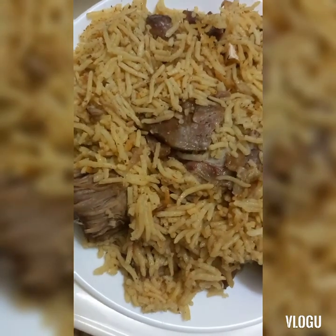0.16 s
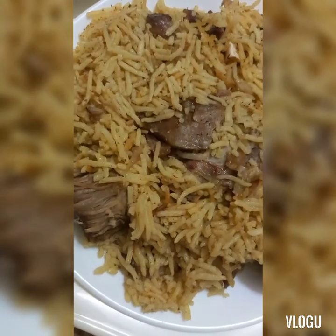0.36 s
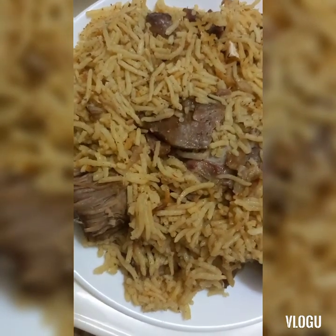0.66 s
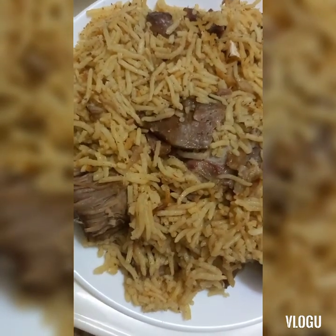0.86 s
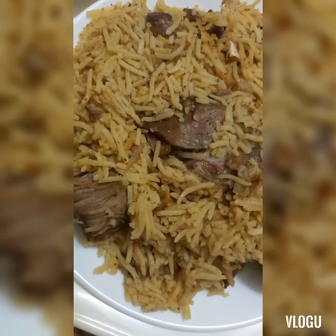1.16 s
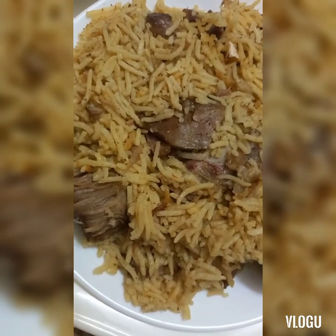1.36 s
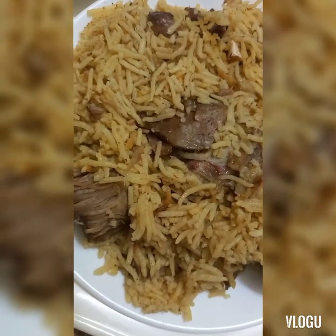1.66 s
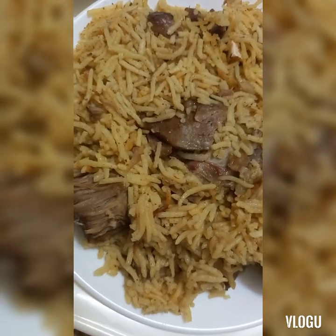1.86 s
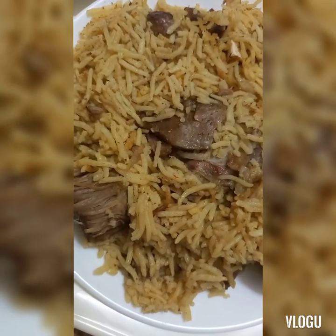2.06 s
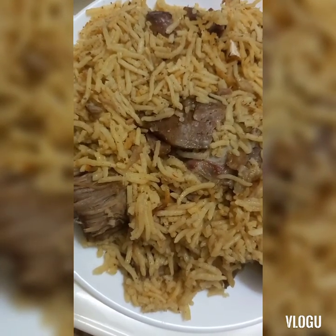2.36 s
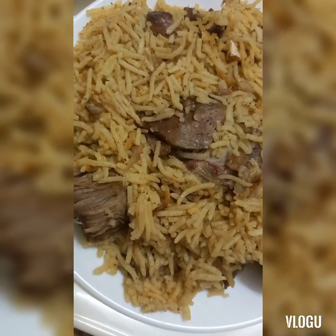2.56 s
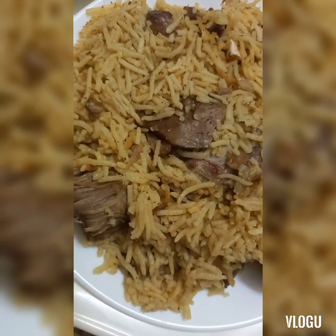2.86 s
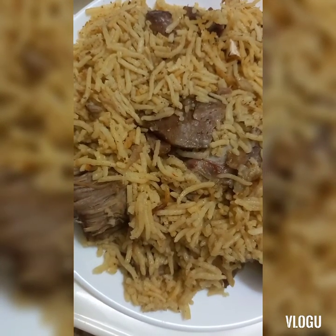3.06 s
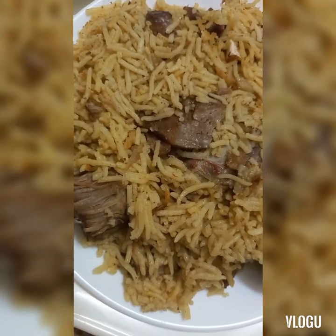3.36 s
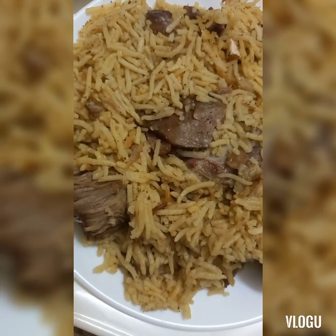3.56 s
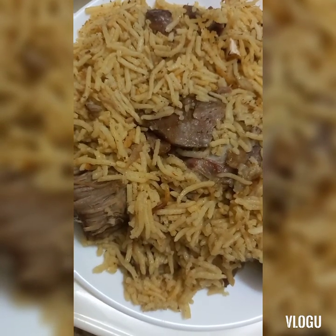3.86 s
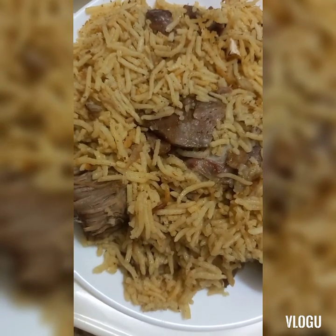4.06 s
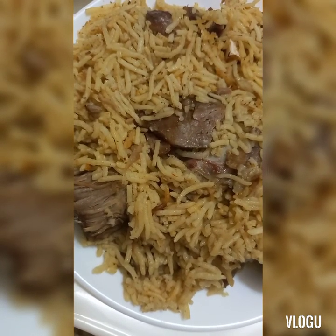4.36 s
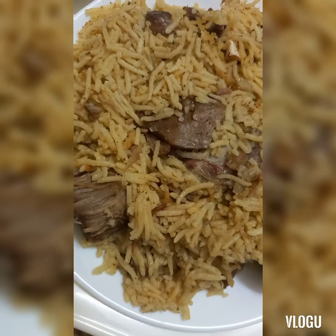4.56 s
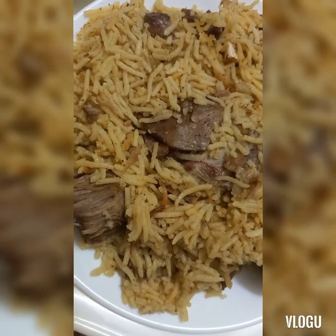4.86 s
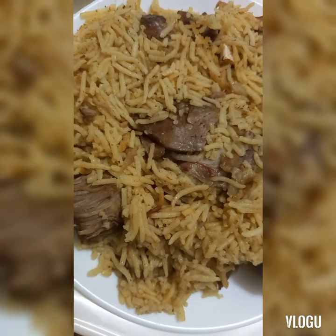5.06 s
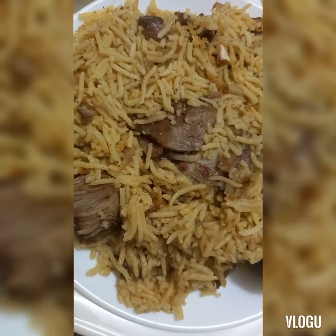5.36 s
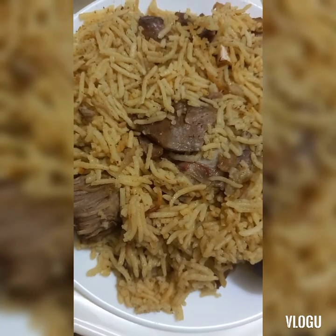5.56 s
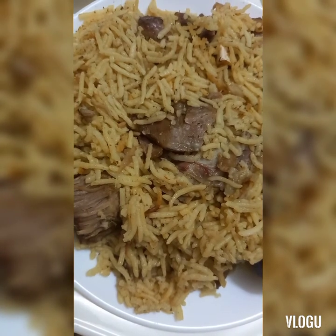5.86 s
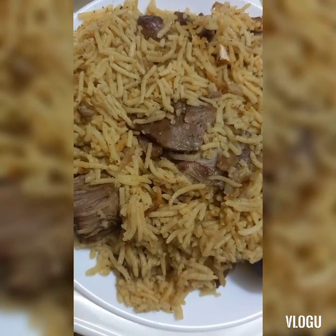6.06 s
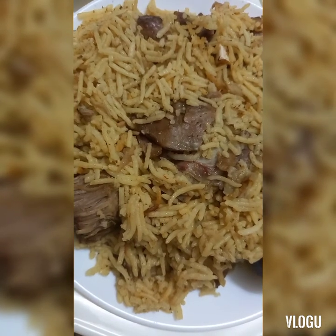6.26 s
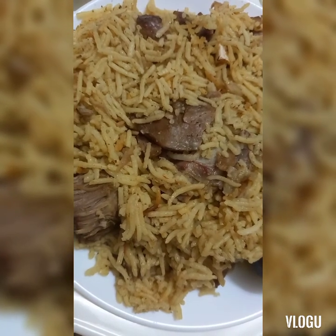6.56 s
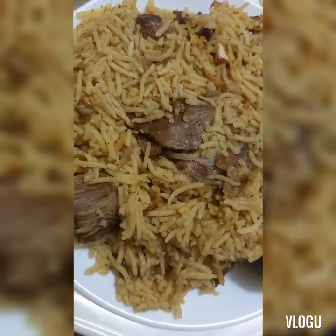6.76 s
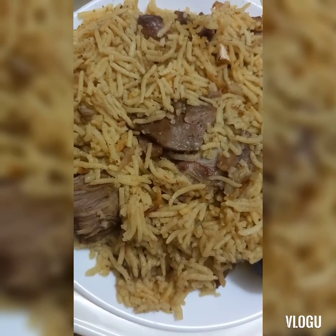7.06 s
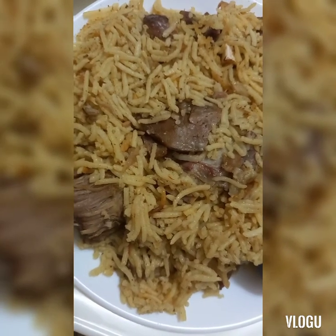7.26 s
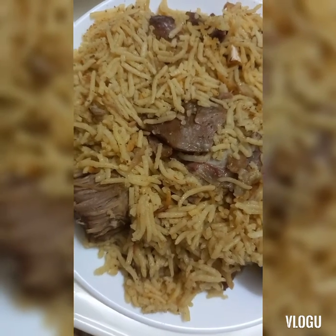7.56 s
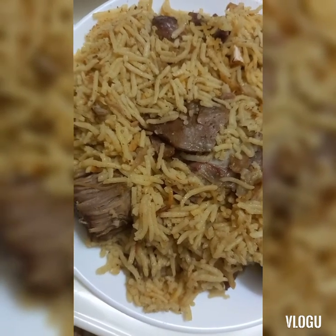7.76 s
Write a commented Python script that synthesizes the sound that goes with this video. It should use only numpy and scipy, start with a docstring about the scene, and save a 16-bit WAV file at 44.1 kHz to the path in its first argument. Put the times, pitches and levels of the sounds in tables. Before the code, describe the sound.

Continuous deep refrigerator-like motor drone with a slight fast flutter, low noisy rumble beneath, weak high whines and a barely audible hiss on top.

```python
"""A low hum is heard first, throbbing nearly five times a second: a sealed compressor running in a kitchen.
Its induction motor turns just under mains speed and sounds shaft multiples with side lines at twice the slip.
A faint row of high multiples and a few steady tones join it. Air and casing rumble is noise shaped by
room modes and shell resonances; a narrow ring comes and goes, and a faint hiss lies on top."""
import sys
import numpy as np
from scipy import signal
from scipy.fft import rfft, irfft
from scipy.io import wavfile
from scipy.ndimage import uniform_filter1d

SR = 44100
rng = np.random.default_rng(int(sys.argv[2]) if len(sys.argv) > 2 else 0)


def convert_level_to_amplitude(level_db):
    """Map a level in decibels to its linear amplitude factor."""
    exponent = np.asarray(level_db, float) / 20
    return 10 ** exponent


def pcm_store(signal):
    """Save signal as 16-bit PCM."""
    levels = np.round(np.clip(np.atleast_2d(signal), -1, 1) * 32767)
    wavfile.write(sys.argv[1], SR, levels.astype(np.int16).T)


N = 349272
TIME = np.arange(N) / SR  # s
HZ = np.fft.rfftfreq(N, 1 / SR)

# Rotation speed of the motor shaft: t/s, f/Hz
SHAFT_SPEED = [(0, 57.646), (2, 57.640), (3, 57.645), (4.5, 57.636), (6, 57.633), (8, 57.637)]


def shaft_turns():
    """Rotation angle, in turns, is the time integral of shaft speed."""
    speed_hz = np.interp(TIME, *np.transpose(SHAFT_SPEED))
    return np.cumsum(speed_hz) / SR


# Shaft harmonics, levels rms: multiple of shaft speed, level/dB, lower side line/dB, upper side line/dB
SHAFT_MULTIPLES = [(1, -66, -84, -84), (2, -49, -78, -78), (4, -41, -68, -61), (5, -64, -72, -83),
                   (6, -61, -80, -85), (7, -69, -86, -79), (8, -70, -87, -87), (9, -78, -82, -94),
                   (10, -78, -96, -83), (15, -79, -95, -88), (16, -81, -90, -93), (19, -77, -94, -91),
                   (21, -82, -99, -93), (26, -79, -102, -102), (27, -81, -89, -89), (31, -80, -97, -87),
                   (32, -86, -103, -92), (33, -74, -88, -88), (35, -87, -98, -104), (36, -86, -99, -97),
                   (38, -67, -77, -83), (39, -82, -79, -81), (40, -83, -82, -88), (41, -89, -98, -92),
                   (42, -84, -96, -90), (44, -86, -91, -89), (46, -85, -94, -92), (47, -88, -86, -93),
                   (48, -73, -79, -76), (49, -69, -73, -78), (50, -82, -84, -82), (51, -89, -86, -97),
                   (53, -90, -92, -97), (54, -91, -99, -93), (57, -81, -91, -96), (58, -92, -101, -96),
                   (60, -89, -106, -100), (88, -96, -107, -117), (96, -94, -100, -105),
                   (98, -95, -94, -108), (108, -95, -102, -116), (111, -93, -109, -102)]


def motor():
    """Modulation side lines: magnetic pull speeds and slows the rotor at twice the slip frequency."""
    mains_hz, waver_db, second_db = 60.04, 0.74, -11
    turn = 2 * np.pi * shaft_turns()
    slip = np.exp(1j * (4 * np.pi * mains_hz * TIME - 2 * turn))
    # side lines nearly a quarter cycle off the main line bend its pitch more than its level
    lean = np.exp(2j * np.pi * 0.22)
    up = lean * slip
    down = lean * slip.conj()
    # weaker second side lines follow
    above = up * (1 + convert_level_to_amplitude(second_db) * up)
    below = down * (1 + convert_level_to_amplitude(second_db) * down)
    wavers = [convert_level_to_amplitude(waver_db * walk(5)) for _ in range(8)]
    out = 0
    for k, (multiple, db, low_db, high_db) in enumerate(SHAFT_MULTIPLES):
        # one piston stroke a turn keeps the multiples roughly in step; the room scatters them
        scatter = 2 * np.pi * 0.45 * rng.random()
        line = np.exp(1j * (multiple * turn + scatter))
        with_sides = line * (convert_level_to_amplitude(db) + convert_level_to_amplitude(low_db) * below + convert_level_to_amplitude(high_db) * above)
        out = out + wavers[k % 8] * with_sides.real
    return np.sqrt(2) * out  # rms to peak


def faint_multiples():
    """Fourier series: high shaft harmonics of uneven strength sum to one waveform repeated every turn."""
    first, last = 61, 150
    first_db, fall_db, scatter_db = -101, 0.3, 4  # rms at the first, fall per multiple, random spread
    multiples = np.arange(first, last + 1)
    uneven_db = scatter_db * rng.standard_normal(len(multiples))
    phases = 2 * np.pi * rng.random(len(multiples))
    sizes = np.sqrt(2) * convert_level_to_amplitude(first_db - fall_db * (multiples - first) + uneven_db)
    one_turn = np.linspace(0, 1, 8193)
    waveform = sizes @ np.cos(2 * np.pi * np.outer(multiples, one_turn) + phases[:, None])
    return np.interp(shaft_turns() % 1, one_turn, waveform)


# Steady tones, levels rms: f/Hz, level/dB, pitch wander/Hz
STEADY_TONES = [(85, -55, .4), (120, -71, .05), (480.3, -71, .1), (749.7, -87, .1)]


def tones():
    """Superposed sinusoids with slow frequency and level modulation: mains hum and an unsteady fan tone."""
    out = 0
    for hz, db, wander_hz in STEADY_TONES:
        level = np.sqrt(2) * convert_level_to_amplitude(db - 0.5 * walk(2.8))
        cycles = np.cumsum(hz + wander_hz * walk(2)) / SR + rng.random()
        out = out + level * np.sin(2 * np.pi * cycles)
    return out


# Clearest swells of a narrow resonance: t/s, rise of level/dB
RING_SWELLS = [(1.06, 9), (2.36, 12.5), (2.73, 9), (4.26, 6), (4.83, 6), (5.89, 11), (6.64, 10)]


def ring():
    """Resonance as a narrow bandpass: noise in one peak whose level wavers and now and then swells."""
    centre_hz, width_hz = 870, 60
    level_db, waver_db, swell_s = -77, 3.5, 0.084
    peak = 1 / (1 + (2 * (HZ - centre_hz) / width_hz) ** 2)
    noise = irfft(rfft(rng.standard_normal(N)) * peak, N)
    swelling_db = level_db + waver_db * walk(6) + swells_db(RING_SWELLS, swell_s)
    return noise / noise.std() * convert_level_to_amplitude(swelling_db)


# Broad noise spectrum before resonances and ripple, low and high part: f/Hz, level/dB per Hz
RUMBLE_COLOUR = [(20, -94), (28, -90), (34, -86), (60, -74.5), (90, -69.5), (150, -71.5), (230, -66),
                 (270, -71.5), (450, -81), (540, -89.5), (1000, -93)]
HISS_COLOUR = [(1000, -93), (1300, -95.5), (2100, -97), (2500, -101), (3100, -101), (3500, -107),
               (6000, -112), (6600, -109), (9000, -109), (11000, -119), (12000, -114), (14200, -117),
               (15000, -125), (15600, -123)]
# Room modes and nulls at the microphone: f/Hz, width/Hz, level/dB
ROOM_MODES = [(61, 3.2, -5), (73.2, 6.9, 9.5), (106.7, 8, 3), (123.3, 12.6, -9), (142, 9.1, 5),
              (164, 15, -1), (189.5, 13, 2.5), (203, 8.4, 3.5), (219, 6.8, 2.5), (226, 5.7, 1),
              (248.5, 6.6, -8), (281, 4.6, -18), (311, 7, -9.5), (350, 6.2, -3.5), (443.5, 11, 6),
              (537, 12, -2.5), (650, 61, 5), (688, 20, -5.5), (755, 36, -9), (713, 12, 2.5), (775, 14, 2.5),
              (904, 18, 2.5), (917, 24, -6), (1044, 37, 2.5)]
# Resonances of the compressor shell: f/Hz, width/Hz, level/dB
SHELL_RESONANCES = [(2200, 100, 4.5), (2820, 134, 7.5), (2980, 45, 6), (5700, 120, 4), (6860, 270, 1.5),
                    (8700, 250, 1), (9850, 120, 1.5), (10450, 140, -1), (12800, 360, 1), (13700, 250, 1)]


def noise_colour_db():
    """Source and filter: a broad spectrum on log frequency plus room, shell and echo responses in dB."""
    hz, db = np.transpose(RUMBLE_COLOUR + HISS_COLOUR[1:])  # the two tables share a row
    broad_db = np.interp(np.log(HZ + 1), np.log(hz), db)
    return broad_db + bumps_db(ROOM_MODES) + bumps_db(SHELL_RESONANCES) + ripple_db(1.8, 30)


# Brief lifts of the top hiss, full in bands starting above 5 kHz: t/s, rise of level/dB
HISS_LIFTS = [(1.1, 1.5), (1.98, 1.5), (4.1, 1.5), (4.89, 3), (5.05, 1.5), (6.29, 2), (6.49, 3)]


def air():
    """Amplitude-modulated noise: higher bands swell together, flicker and pulse twice a shaft turn."""
    steady_below_hz, full_share_hz = 700, 5000
    flicker_db, lift_s = 0.6, 0.036
    # times sqrt(SR / 2): white noise of 0 dB per Hz
    noise = rfft(rng.standard_normal(N)) * convert_level_to_amplitude(noise_colour_db()) * np.sqrt(SR / 2)
    shared_db = 0.3 * walk(16) + 0.7 * walk(9) + swells_db(HISS_LIFTS, lift_s)
    strokes = 0.02 * np.cos(4 * np.pi * shaft_turns())
    out = irfft(noise * (HZ < steady_below_hz), N)
    for low in steady_below_hz * 2 ** np.arange(0, 5, 0.5):  # half-octave bands
        inside = (HZ >= low) * (HZ < low * np.sqrt(2))
        band = irfft(noise * inside, N)
        share = min(low / full_share_hz, 1)
        level = convert_level_to_amplitude(share * shared_db + flicker_db * walk(8))
        out = out + band * level * (1 + share * strokes)
    return out


def bumps_db(modes):
    """Modal response: resonance peaks and dips sum in dB over frequency."""
    return sum(db / (1 + (2 * (HZ - hz) / width) ** 2) for hz, width, db in modes)


def ripple_db(depth_db, width_hz):
    """Interference: many wall echoes add up unevenly from one frequency to the next."""
    k = int(width_hz * N / SR)
    uneven = uniform_filter1d(uniform_filter1d(rng.standard_normal(len(HZ)), k), k)
    onset = np.clip(HZ / 1000 - 0.5, 0, 1)  # none below 500 Hz, full from 1500 Hz
    return depth_db * uneven / uneven.std() * onset


def swells_db(rows, length_s):
    """Gaussian envelopes: smooth rises and falls of one length, summed in dB."""
    return sum(db * np.exp(-((TIME - s) / length_s) ** 2) for s, db in rows)


def walk(rate):
    """Low-pass random modulation: levels held 1 / rate s and slewed twice, spread near 1."""
    k = int(SR / rate)
    held = np.repeat(rng.standard_normal(N // k + 1), k)
    return np.sqrt(2) * uniform_filter1d(uniform_filter1d(held, k), k)[:N]


def scene():
    """Linear superposition of all sources at one microphone."""
    return (motor() + faint_multiples() + tones() + ring() + air())[None]


def top_cut(x):
    """Nothing passes above the cut-off."""
    return signal.sosfilt(signal.butter(12, 15640, fs=SR, output="sos"), x)


def record(dry):
    """Single-channel pickup: the finished mix is taken as it stands at the microphone."""
    return top_cut(dry)


dry = scene()
out = record(dry)
pcm_store(out)
```